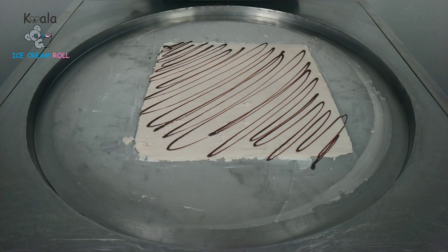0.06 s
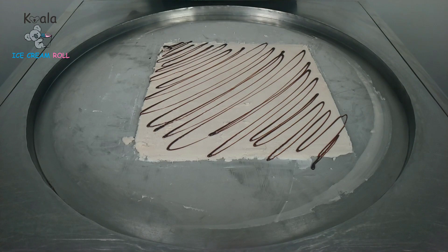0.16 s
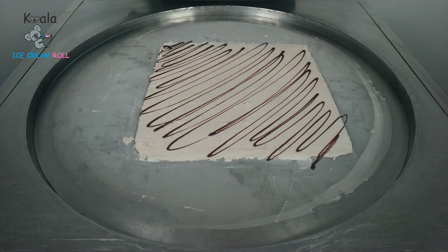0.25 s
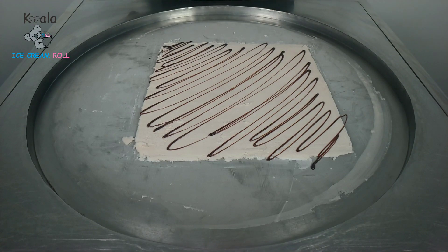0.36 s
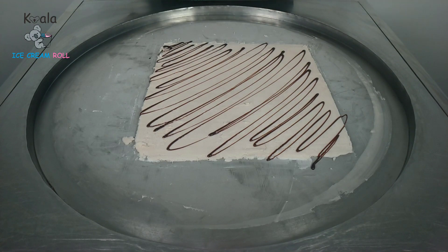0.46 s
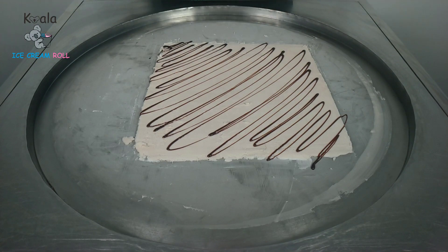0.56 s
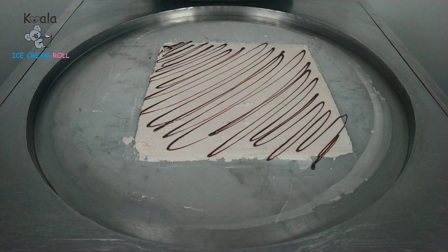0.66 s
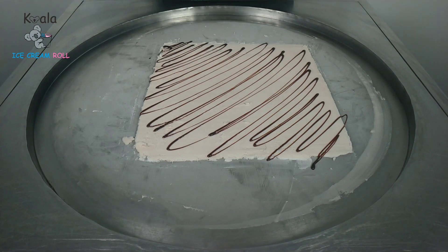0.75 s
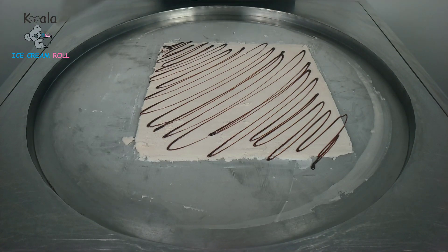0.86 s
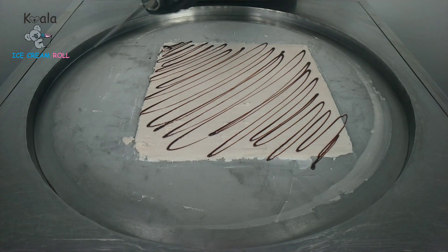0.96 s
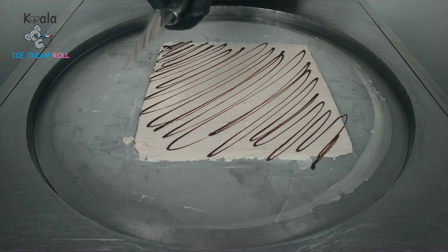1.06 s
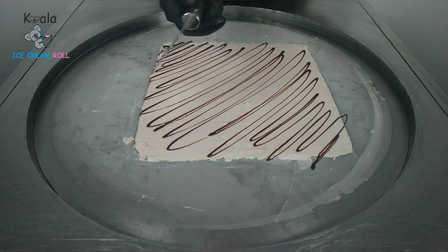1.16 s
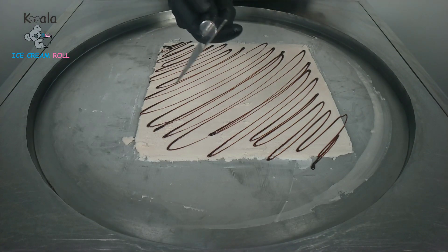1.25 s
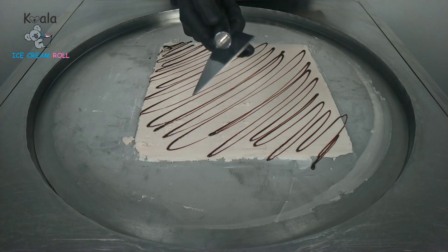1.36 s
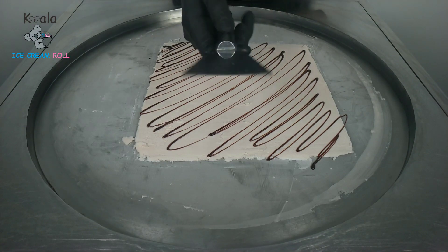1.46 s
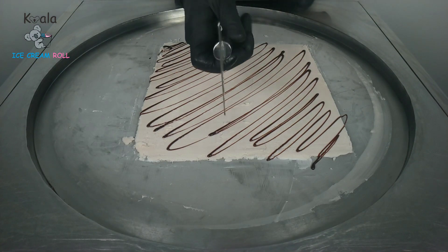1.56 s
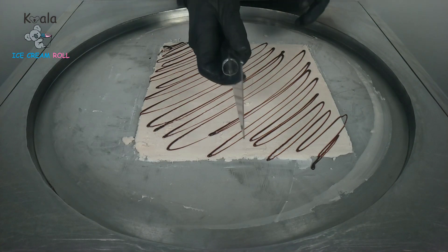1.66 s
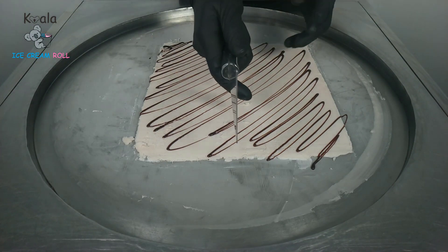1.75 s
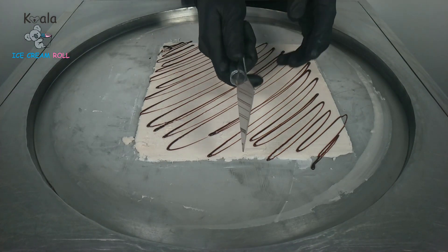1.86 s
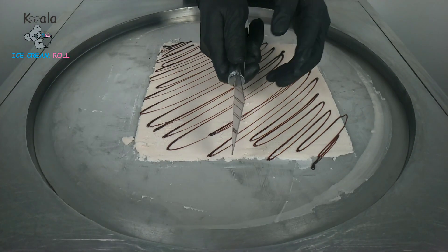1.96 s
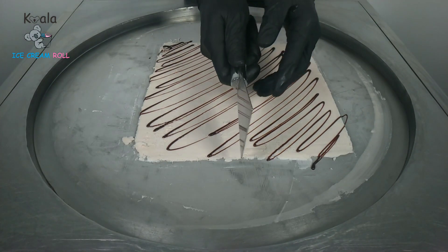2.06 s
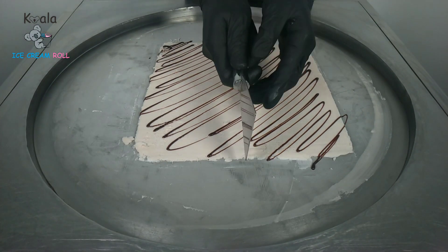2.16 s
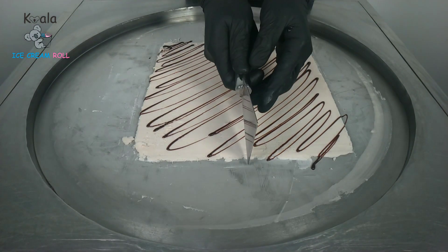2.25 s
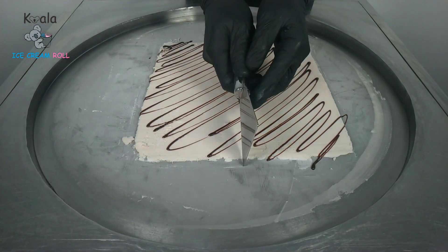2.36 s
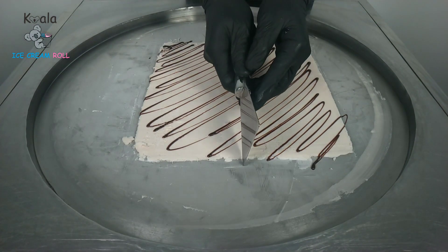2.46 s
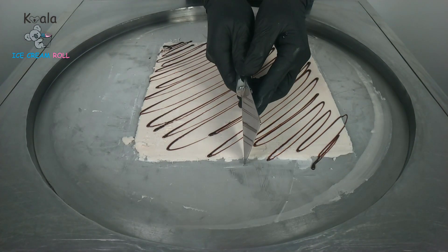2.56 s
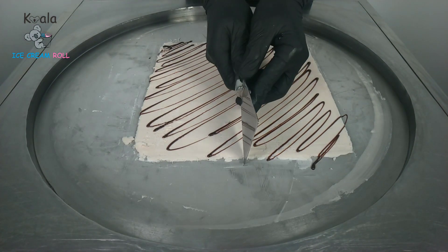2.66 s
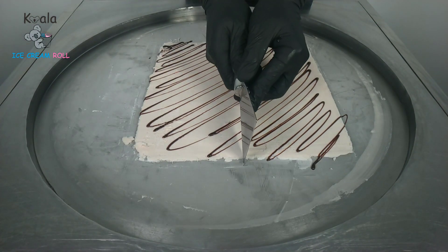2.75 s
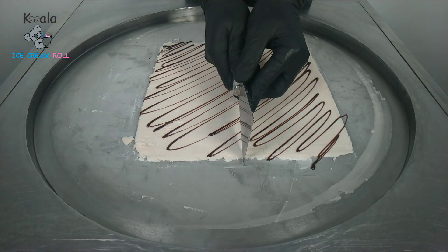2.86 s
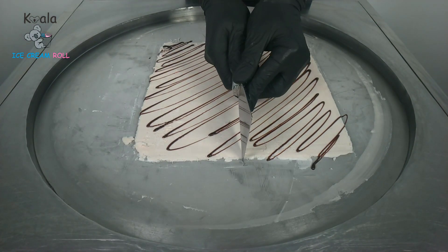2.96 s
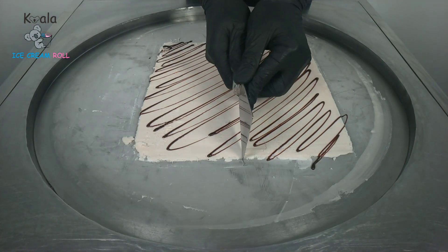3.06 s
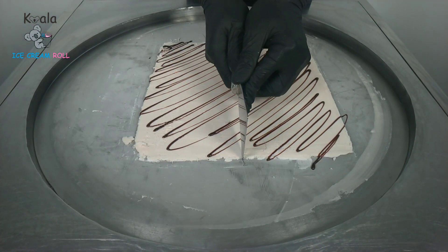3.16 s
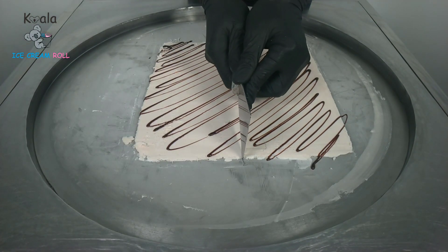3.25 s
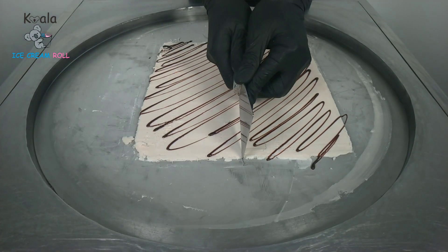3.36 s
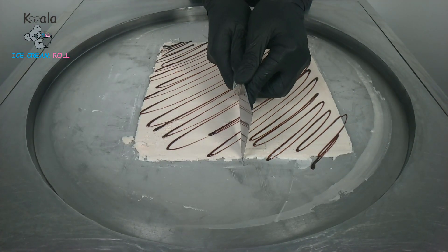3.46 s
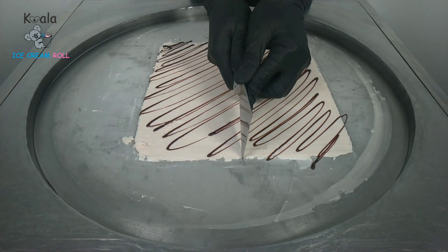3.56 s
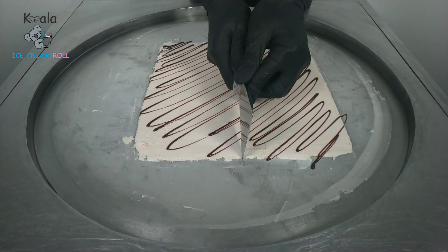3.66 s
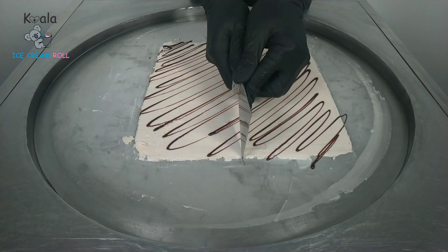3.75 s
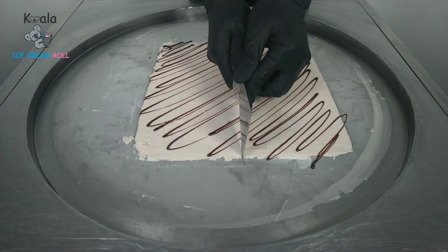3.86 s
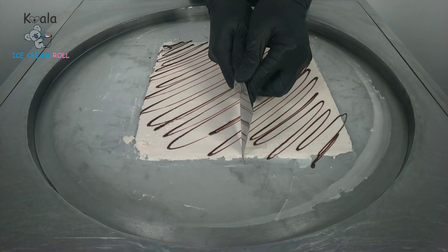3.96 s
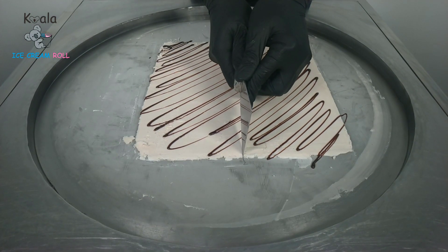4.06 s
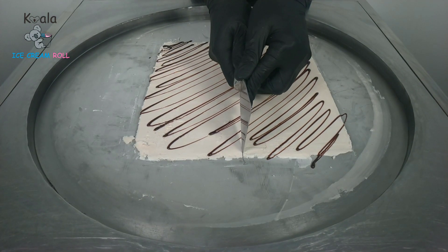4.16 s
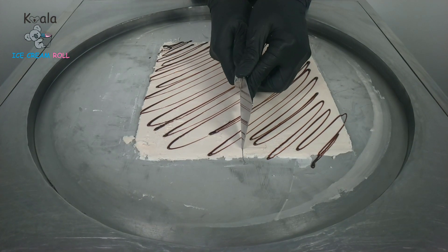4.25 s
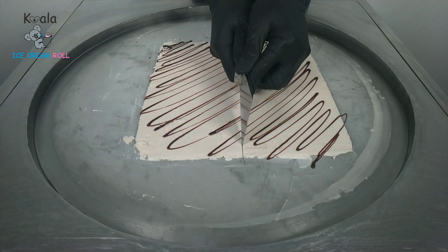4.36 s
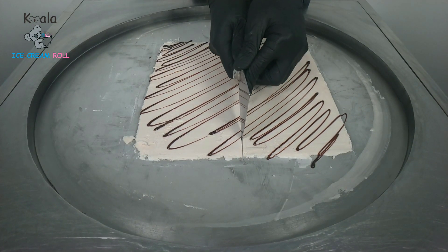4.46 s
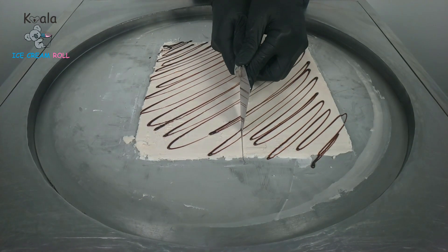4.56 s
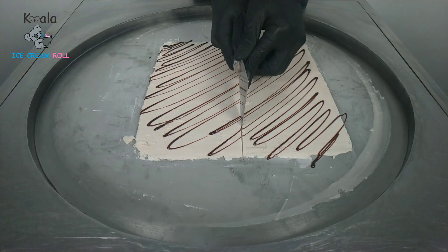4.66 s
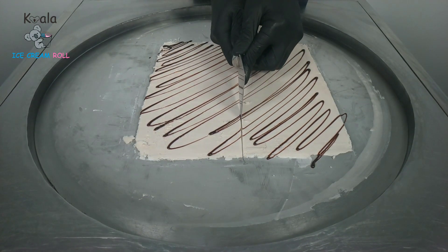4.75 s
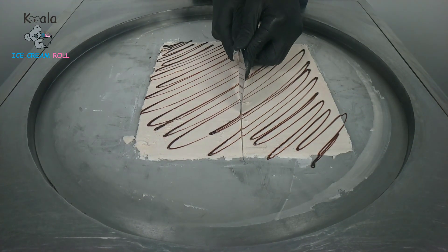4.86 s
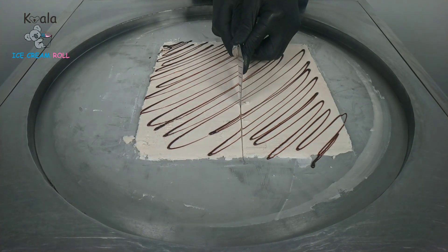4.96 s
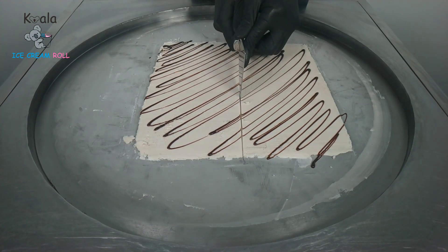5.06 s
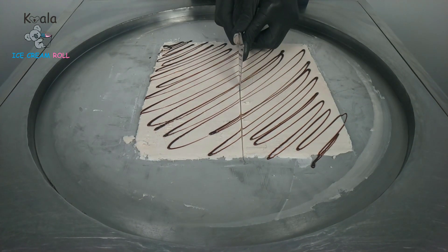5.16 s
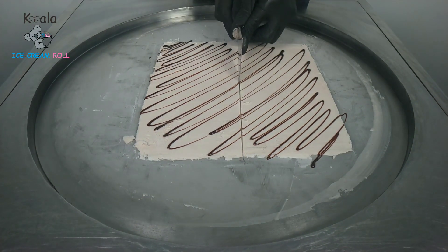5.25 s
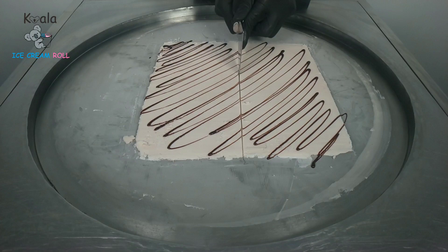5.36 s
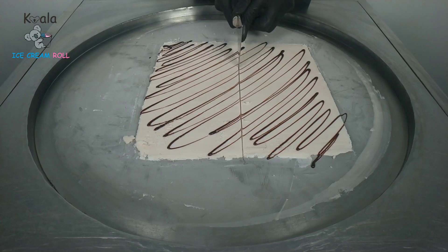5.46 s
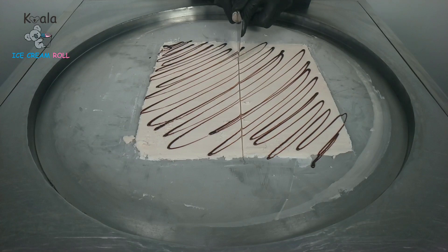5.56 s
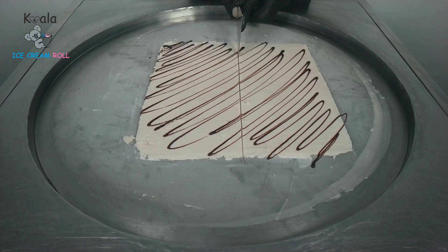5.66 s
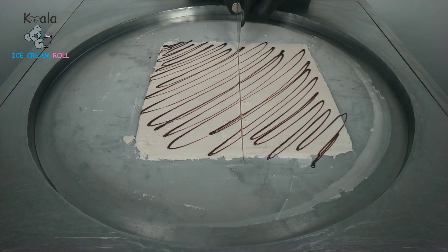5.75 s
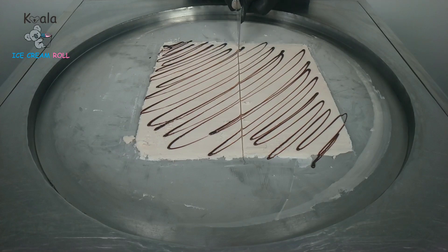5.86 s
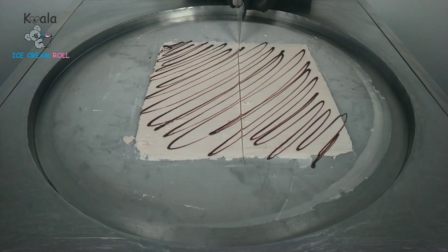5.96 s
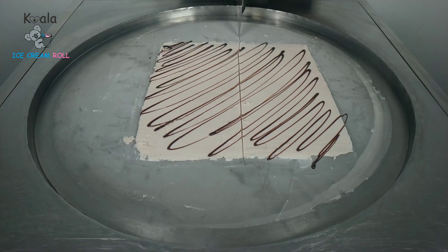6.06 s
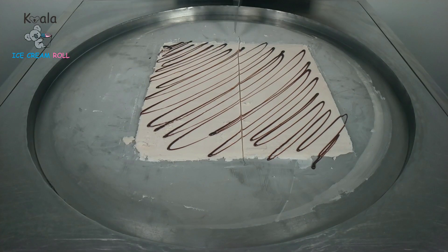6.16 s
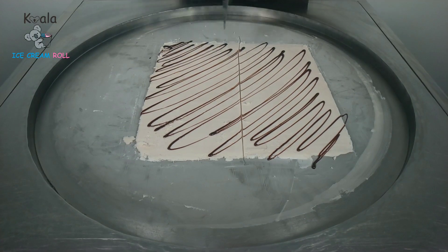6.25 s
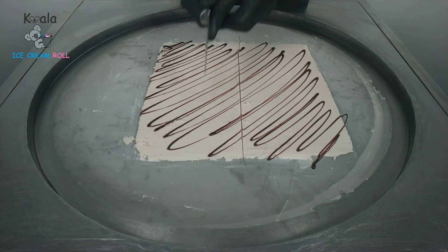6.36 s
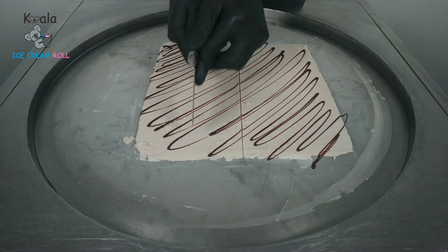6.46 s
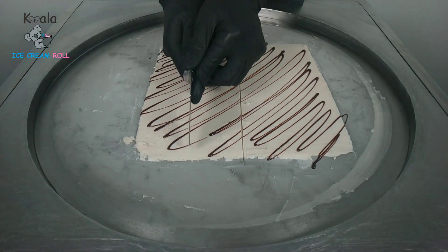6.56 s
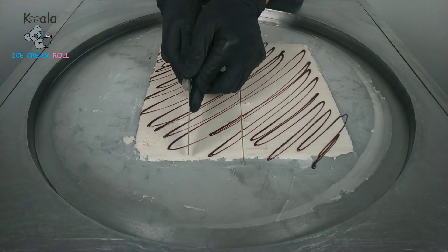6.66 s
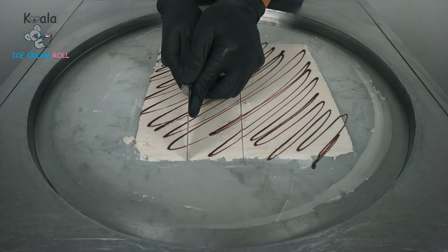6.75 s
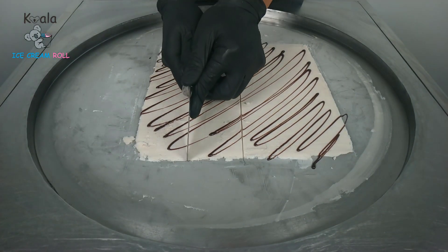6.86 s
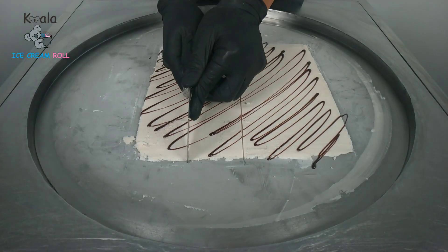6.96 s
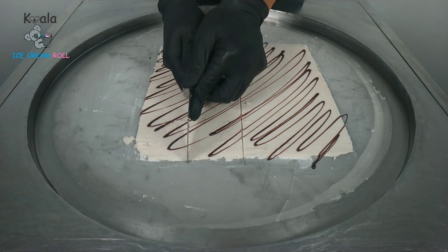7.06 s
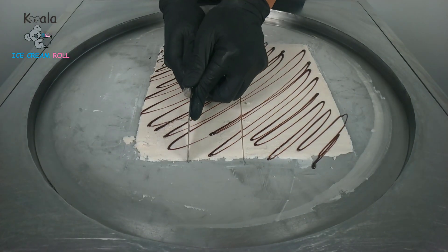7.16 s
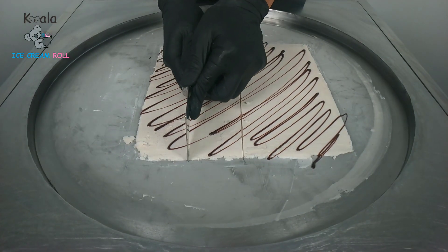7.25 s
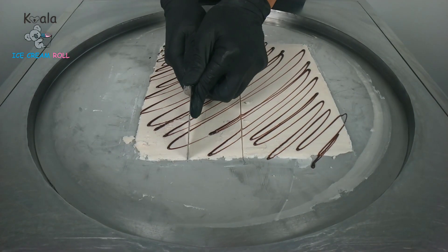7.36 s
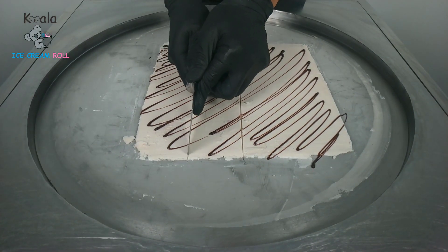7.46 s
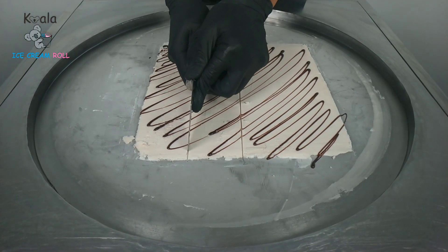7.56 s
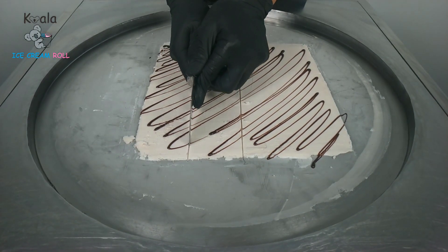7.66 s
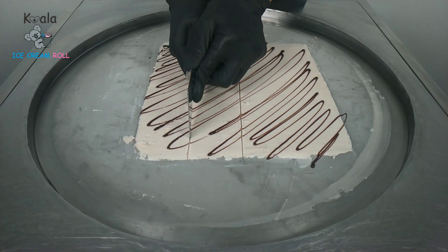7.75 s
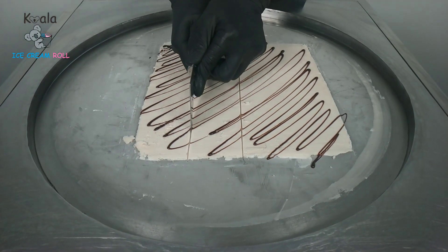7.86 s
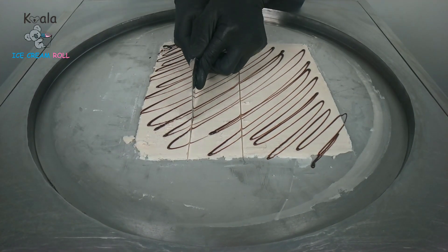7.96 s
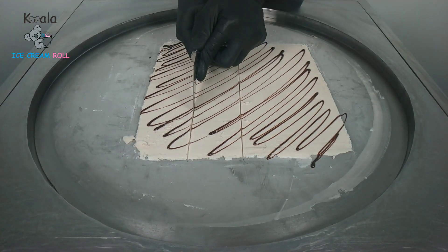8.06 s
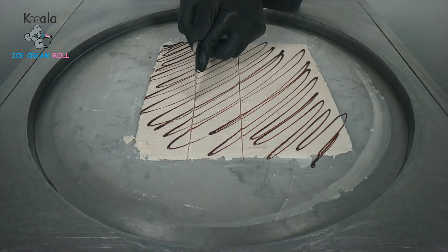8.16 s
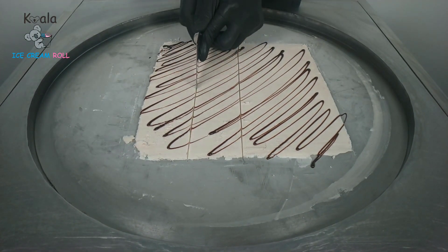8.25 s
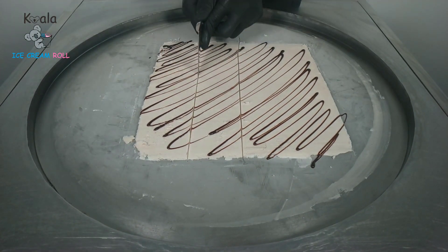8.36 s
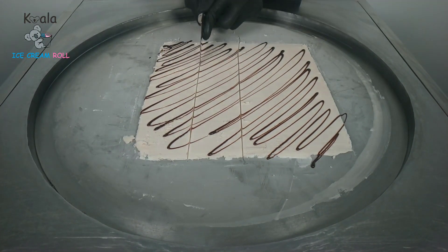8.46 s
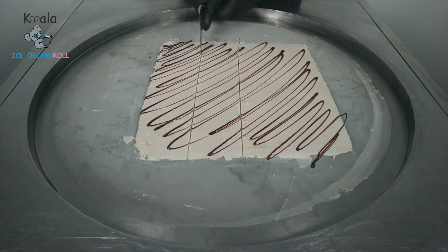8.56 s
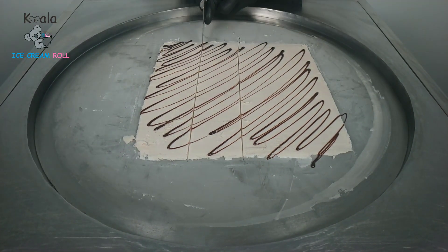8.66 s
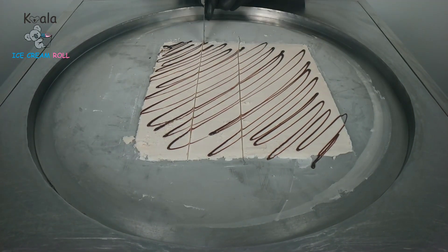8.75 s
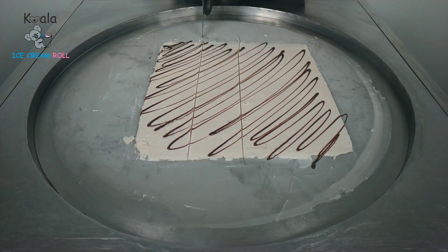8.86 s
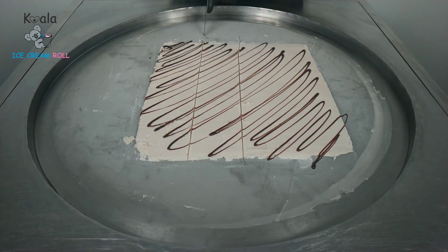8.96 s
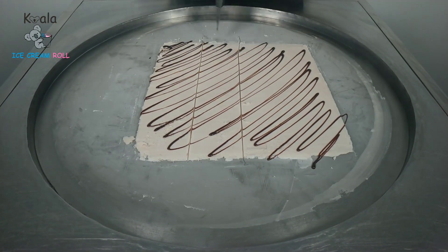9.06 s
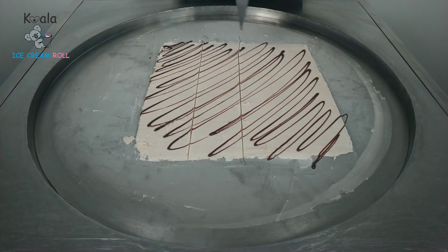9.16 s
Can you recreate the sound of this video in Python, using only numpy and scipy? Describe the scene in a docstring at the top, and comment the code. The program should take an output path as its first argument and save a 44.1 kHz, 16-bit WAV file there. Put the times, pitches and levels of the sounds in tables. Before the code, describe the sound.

In a small work area with low rumbling and faint motor tones, a steel tool is handled lightly, rustling and ringing softly. It strikes a frozen steel plate with a loud, short metallic crack, then thuds dully into a frozen sheet and drags with a grainy hiss. Two more hard knocks arrive well apart, each around stronger scraping. A single microphone hears everything fairly close and dry, with brief plate ringing.

```python
"""A steel spatula is knocked down on a frozen steel plate and drawn through a sheet of ice cream.
Blows thud the plate, ring its modes and the blade's and leave a dense wash of coloured noise.
Uneven random slips through a bed and damped resonances give handling rustle, then, from the first hard knock,
the scraping edge; short brushes glide upward, and a steel tone swells and dies away early.
Room air, a low rumble and motor tones place us by a freezer. One mono microphone; distance is only level."""
import sys
import numpy as np
from scipy import signal
from scipy.fft import rfft, irfft
from scipy.io import wavfile
from scipy.ndimage import uniform_filter1d, minimum_filter1d

SR = 44100
rng = np.random.default_rng(int(sys.argv[2]) if len(sys.argv) > 2 else 0)


def materialize(psi):
    """Save the field psi as 16-bit PCM at rate SR to the path in sys.argv[1].

    A 1-D psi becomes a single channel; in a 2-D psi each row is a channel.
    """
    bounded = np.clip(np.atleast_2d(psi).T, -1, 1)
    quanta = np.round(bounded * 32767).astype(np.int16)
    wavfile.write(sys.argv[1], SR, quanta)


N = 406161
T = np.arange(N) / SR
HZ = np.maximum(np.arange(N // 2 + 1) * SR / N, 1)
TOP_HZ = 15550  # top of the recorded band


def undb(db):
    """dB to gain."""
    return 10 ** (np.asarray(db) / 20)


def level(x, db):
    """Scale to an rms level [dB]."""
    return x * undb(db) / np.sqrt(np.mean(x ** 2))


def along(table, hz):
    """Read (frequency [Hz], value) points on a log frequency axis."""
    points_hz, values = np.transpose(table)
    return np.interp(np.log(hz), np.log(points_hz), values)


def colour(x, gain):
    """Weight a spectrum."""
    return irfft(rfft(x) * gain, N)


def hump(hz, octaves):
    """Bell-shaped band on a log frequency axis."""
    return np.exp(-.5 * (np.log2(HZ / hz) / octaves) ** 2)


def ring(x, hz, t60):
    """One decaying mode driven by x: a two-pole resonator."""
    pole = np.exp(2j * np.pi * hz / SR - np.log(1000) / (t60 * SR))
    return signal.lfilter([pole.imag], [1, -2 * pole.real, abs(pole) ** 2], x)


def walk(rate):
    """Random levels held 1 / rate s and smoothed twice."""
    hold = int(SR / rate)
    steps = np.repeat(rng.standard_normal(N // hold + 1), hold)
    return 0.95 * uniform_filter1d(uniform_filter1d(steps, hold), hold)[:N]


def spikes(times, gains):
    """Impulses at given times [s]."""
    out = np.zeros(N)
    out[(np.asarray(times) * SR).astype(int)] = gains
    return out


def decay(t, t60):
    """Exponential fall from t = 0, silent before."""
    return (t >= 0) * 1000. ** (-np.maximum(t, 0) / np.maximum(t60, .002))


# spectrum of the room air: (frequency [Hz], relative level [dB per Hz])
ROOM_SPECTRUM = [(70, -27), (105, -3.5), (260, -11.5), (480, -13.5), (1100, -18), (1900, -22.5),
                 (2400, -29), (2850, -30.5), (3800, -31), (5900, -30), (9200, -25.5), (10800, -25.5),
                 (11800, -33.5), (15500, -37)]
ROOM_DB = -63  # rms of the air before its bands flicker


def room_air():
    """Noise with the room's spectrum, in octave bands that flicker separately."""
    noise = rfft(rng.standard_normal(N)) * undb(along(ROOM_SPECTRUM, HZ))
    full_rms = np.sqrt(np.mean(irfft(noise, N) ** 2))
    air = np.zeros(N)
    for hz in 120 * 2. ** np.arange(8):
        air += irfft(noise * hump(hz, 0.41), N) * undb(2.0 * walk(37))
    return air / full_rms * undb(ROOM_DB)


# swell of the freezer's rumble: (time [s], level [dB])
RUMBLE_LEVEL = [(0.0, -64), (.46, -56), (1.3, -57), (1.92, -65.5), (2.5, -63.5), (4.16, -60.5), (5.6, -59),
                (6.0, -64), (7.7, -62.5), (8.8, -56.5), (9.21, -69)]
# spectrum of the rumble: (frequency [Hz], relative level [dB per Hz])
RUMBLE_SPECTRUM = [(20, -41.5), (33, -29.5), (48, 6), (62, 7.5), (76, -1), (95, -25.5), (130, -21.5)]
# faint motor tones: (mean frequency [Hz], mean peak level [dB])
MOTOR_TONES = [(876, -72), (630, -76)]


def freezer():
    """A swelling rumble of noise below 200 Hz, and motor tones that waver in pitch and level."""
    low_gain = undb(along(RUMBLE_SPECTRUM, HZ)) * (HZ < 200)
    s, db = np.transpose(RUMBLE_LEVEL)
    out = level(colour(rng.standard_normal(N), low_gain), 0) * undb(np.interp(T, s, db))
    for hz, db in MOTOR_TONES:
        phase = 2 * np.pi * np.cumsum(hz + 6 * walk(24)) / SR
        out += undb(db + 3.3 * walk(5.5)) * np.sin(phase)
    return out


# handling rustle before the first hard knock, then the edge drawn over the plate:
# (time [s], level [dB] of the part below SPLIT_HZ)
RUSTLE_AND_SCRAPE_LEVEL = [(0.0, -54.5), (.3, -55), (.6, -59.5), (.95, -48.5), (1.3, -63.5), (2.4, -68),
                           (2.5, -49), (2.62, -47), (2.9, -57.5), (3.9, -70.5), (4.23, -59.5), (5.2, -53.5),
                           (5.449, -50.5), (6.2, -39.5), (6.44, -54.5), (6.8, -64.5), (6.999, -57.5),
                           (7.5, -70), (7.851, -54), (8.0, -48.5), (8.59, -43.5), (8.9, -48), (9.11, -37.5),
                           (9.21, -53.5)]
# damped resonances of the plate under the frozen sheet: (frequency [Hz], width [Hz], relative level [dB])
DAMPED_PEAKS = [(250, 39, -7), (630, 97, -4.5), (959, 55, 1.5), (1302, 54, -8), (1814, 150, -5),
                (2010, 180, -6), (3700, 130, -15), (4200, 440, -22.5), (7100, 40, -10), (9100, 560, -23)]
# broad bed of rustle and scrape: (frequency [Hz], relative level [dB per Hz])
SCRAPE_SPECTRUM = [(120, -40), (250, -8), (800, 1), (1500, 0), (2050, -7.5), (2350, -5.5), (2800, -13.5),
                   (3500, -6), (5000, -7), (5900, -14), (7000, -11), (10800, -15), (11800, -37.5),
                   (15500, -27.5)]
SPLIT_HZ, HISS_DB = 2750, -6.5  # the upper part against the lower
OFF_PLATE_DB = -4.5  # the resonances are weaker until the first hard knock lands on the plate


def rustle_and_scrape():
    """Dense uneven slips drive a broad bed and damped resonances, each flickering alone."""
    slip_db = 2.2 * np.minimum(rng.exponential(size=N), 6) + 1.5 * walk(60)
    slips = rfft(rng.standard_normal(N) * undb(slip_db))
    bed = slips * undb(along(SCRAPE_SPECTRUM, HZ))
    upper = 1 / (1 + (SPLIT_HZ / HZ) ** 16)
    low, hiss = irfft(bed * np.sqrt(1 - upper), N), irfft(bed * np.sqrt(upper), N)
    off_plate_db = OFF_PLATE_DB * (T < KNOCKS[0][0])
    for hz, width, db in DAMPED_PEAKS:
        resonance = undb(db + 5) / (1 + 1.3j * (HZ - hz) / width) ** 2
        flicker_db = 2.6 * walk(9) + 1.5 * walk(2)
        tone = irfft(slips * resonance, N) * undb(flicker_db + off_plate_db)
        if hz < SPLIT_HZ:
            low += tone
        else:
            hiss += tone
    s, db = np.transpose(RUSTLE_AND_SCRAPE_LEVEL)
    return (level(low, 0) + level(hiss, HISS_DB)) * undb(np.interp(T, s, db))


# the steel tone swells and dips as the steel thing is moved about: (time [s], level [dB])
STEEL_TONE_LEVEL = [(0.0, -58), (.05, -52), (.42, -50.5), (.58, -55), (.65, -71), (.73, -59), (.81, -66),
                    (.86, -58), (1.0, -54), (1.26, -67), (1.63, -69), (2.3, -79)]
STEEL_TONE_HZ = 1585
# its upper partials: frequencies [Hz]
UPPER_PARTIAL_HZ = (3661, 3898)
# and, for each, (peak level [dB], time to fall 60 dB [s])
UPPER_PARTIALS = [(-61, 2.4), (-57, 1.2)]


def steel_tone():
    """A long steel sine that follows its level, with two upper partials struck once and left to decay."""
    s, db = np.transpose(STEEL_TONE_LEVEL)
    amplitude = np.sqrt(2) * undb(np.interp(T, s, db, right=-120))
    out = amplitude * np.sin(2 * np.pi * STEEL_TONE_HZ * T)
    for hz, (db, t60) in zip(UPPER_PARTIAL_HZ, UPPER_PARTIALS):
        out += ring(spikes([.03], undb(db)), hz, t60)
    return out


# noise spectrum of the struck plate: (frequency [Hz], relative level [dB per Hz])
PLATE_SPECTRUM = [(40, -38.5), (70, -23), (140, -26), (275, -11.5), (400, -15.5), (1300, -10), (1850, 0.5),
                  (2200, -8), (2750, -14), (3450, -3), (5200, -9), (5900, -20), (10800, -24.5),
                  (15500, -41.5)]
# how long the wash of dense modes lasts: (frequency [Hz], time to fall 60 dB [s])
WASH_DECAY = [(70, 0.51), (250, 0.18), (700, 0.37), (1300, 0.57), (1900, 0.52), (2750, 0.43), (3600, 0.54),
              (5200, 0.55), (9000, 0.38), (15000, 0.34)]
# single modes of the plate: frequencies [Hz]
PLATE_MODE_HZ = (70, 210, 275, 398, 474, 515, 645, 700, 748, 845, 938, 1139, 1266, 1362, 1600, 1765, 1860,
                 1920, 1985, 2230, 3650, 3887, 4050, 4357, 4620, 5157)
# and, for each, (relative level [dB], time to fall 60 dB [s])
PLATE_MODES = [(-12, 0.31), (-13.5, 0.51), (3.5, 0.2), (-5, 0.34), (-6, 0.17), (-9, 0.41), (-1, 0.094),
               (-10, 0.16), (-10.5, 0.52), (-15.5, 0.4), (6, 0.17), (-5.5, 0.33), (-2.5, 0.067),
               (-3.5, 0.28), (-4.5, 0.68), (-6.5, 0.28), (-2.5, 0.35), (1, 0.62), (-6, 0.13), (-9.5, 0.49),
               (-7, 0.2), (-7.5, 0.11), (-7.5, 0.055), (-7.5, 0.074), (1, 0.087), (0, 0.18)]
# single modes of the blade: frequencies [Hz]
BLADE_MODE_HZ = (5940, 6160, 7190, 7290, 7440, 8963, 9410, 10330, 11495, 12020, 12870, 13920, 14420)
# and, for each, (relative level [dB], time to fall 60 dB [s])
BLADE_MODES = [(-7.5, 0.08), (-6, 0.12), (-3, .35), (1.5, 0.17), (-1, 0.12), (-5, 0.24), (5.5, 0.092),
               (-4.5, 0.14), (0, 0.3), (-11.5, 0.22), (-6, .09), (-9, 0.087), (-8, .1)]
# the blade knocked hard on bare steel: (time [s], blow level [dB], brightness [dB per octave],
# pitch of the struck spot [Hz], ring length [1 = free], boom of the table [dB], blade [dB])
KNOCKS = [(2.403, -2.5, -0.37, 1800, 0.97, -5, 10.5), (6.117, -2.5, 0.37, 1774, 0.96, 5, -4),
          (8.908, -2, 2.1, 1700, 1.126, 9, -4.5)]
# dull thuds of the blade into the frozen sheet, same columns; the first row is the dying end of an earlier blow
THUDS = [(.003, -34.5, 0.65, 240, 1.17, -6, 7), (2.81, -31.5, 2.4, 1610, 0.52, -11, 16.5),
         (4.058, -21.5, 1.2, 2160, 0.99, 7, -1), (5.233, -17.5, 0.75, 2100, 0.83, 9.5, -16),
         (6.29, -33, -2, 1880, 0.87, -1, .1), (6.843, -20, -1.6, 950, 0.71, -17, -14),
         (7.479, -41.5, 2.4, 1065, 1, 1.2, -3.5), (8.605, -14.5, 0.41, 2080, 0.65, 5, -5)]
# small bright ticks, same columns
TICKS = [(.543, -49, -1, 3500, 0.49, 2, -1), (.759, -31, 2.3, 8100, 0.47, -12, 1),
         (.827, -42.5, 0.93, 10900, 0.6, .1, 6), (.979, -38, -0.4, 1920, 0.56, 5, 22.5),
         (1.619, -48, .1, 8500, .4, .1, -8), (1.776, -35, -3.4, 7900, 0.5, 4, 18),
         (1.969, -50, .1, 4150, 0.79, 17, 10), (3.111, -39.5, -0.28, 4100, .4, 4, -8),
         (3.298, -40.5, 1.5, 8950, 0.41, 0.8, -14.5), (4.84, -36.5, 1.7, 5700, 0.27, -4, -5),
         (5.987, -54, -0.02, 9000, .3, -25, .1), (6.015, -39, 1.5, 10500, .3, .1, 9)]
# frequencies at which each kind of blow has its colour [Hz]
KIND_HZ = (70, 280, 620, 940, 1300, 1880, 4200, 8500, 13000)
# character of a knock: (levels at KIND_HZ against the blow level [dB], wash [dB], blade ring [dB],
# lift at the struck spot [dB], width of that lift [octaves])
KNOCK_KIND = (-47, -27.5, -23.5, -21.5, -14, -14, -11, -25.5, -43.5), -16, -13.5, 4.5, 0.1
# character of a thud, same columns
THUD_KIND = (-24.5, -16.5, -13, -21.5, -25.5, -18.5, -26.5, -24, -61), -13.5, -14, 13.5, 0.26
# character of a tick, same columns
TICK_KIND = (-38, -37.5, -26, -23.5, -25.5, -14.5, -20.5, -16.5, -27), -15.5, -23, 11, .35
TOUCH_S, TOUCH_DB = .0025, -24  # lead and level of the light touch before a hard blow
CUSHION_S = .012  # extra build-up time of a thud
BOOM_HZ, BLADE_FROM_HZ = 120, 7500  # boom lies below the one; blade crack grows over an octave above the other
BAND_HZ = 60 * 2 ** np.arange(0, 8.1, 1 / 3)  # third-octave centres


def plate_bands():
    """Noise of the plate's many dense modes, cut into third-octave bands."""
    # 0 dB per Hz puts unit power into 420 Hz
    noise = rfft(rng.standard_normal(N)) * undb(along(PLATE_SPECTRUM, HZ)) * np.sqrt(SR / 2 / 420)
    # the damped resonances stand out of the wash too
    peaks = sum(0.8 / (1 + (2 * (HZ - hz) / width) ** 2) for hz, width, _ in DAMPED_PEAKS)
    noise *= np.sqrt(0.73 + peaks)
    return np.array([np.resize(irfft(noise * hump(hz, 1 / 7), N), N + SR) for hz in BAND_HZ])


def blow_db(hz, blow, kind):
    """Level of a blow at hz: its kind's colour, tilted, lifted at the struck spot, with boom and blade."""
    _, peak_db, bright_db, spot_hz, _, boom_db, blade_db = blow
    kind_db, _, _, spot_db, octaves = kind
    # the colour is taken against the plate's spectrum and a bandwidth that grows with frequency
    kind_gain_db = kind_db - along(PLATE_SPECTRUM, KIND_HZ) - 10 * np.log10(np.array(KIND_HZ) / 1800)
    db = peak_db + along(np.transpose([KIND_HZ, kind_gain_db]), hz)
    db = db + bright_db * np.log2(hz / KIND_HZ[5])
    db = db + spot_db * np.exp(-.5 * (np.log2(hz / spot_hz) / octaves) ** 2)
    return db + boom_db * (hz < BOOM_HZ) + blade_db * np.clip(np.log2(hz / BLADE_FROM_HZ), 0, 1)


def noise_shape(t, length, wash_db, hard, cushion):
    """Envelope per band: a sharp snap, a crack and the slower wash."""
    centres = BAND_HZ[:, None]
    # in a hard blow a corner touches lightly just before the edge lands
    since_touch = t + TOUCH_S
    touch = hard * undb(TOUCH_DB) * decay(since_touch, 0.046) * (1 - decay(since_touch, 0.0027))
    snap = undb(3.0) * decay(t, length * (0.023 + 6 / centres))
    crack = undb(-11.5) * decay(t, length * (0.019 + 14 / centres))
    # the wash fills in slowly as waves spread over the plate and come back off the walls
    wash_fall = decay(t, length * along(WASH_DECAY, BAND_HZ)[:, None])
    wash = undb(wash_db + 5) * (wash_fall - 0.65 * decay(t, length * .22))
    # a band needs a cycle or so to build up, and longer when the frozen sheet cushions the blow
    swell = 1 - decay(t, cushion + 3 / centres)
    return np.sqrt(touch ** 2 + swell ** 2 * (snap ** 2 + crack ** 2 + wash ** 2))


def blows():
    """Each blow cracks, rings the modes of plate and blade and leaves a wash of dense modes."""
    out, span = np.zeros(N + SR), int(.55 * SR)
    bands = plate_bands()
    hz = np.array(PLATE_MODE_HZ + BLADE_MODE_HZ)
    mode_db, t60 = np.transpose(PLATE_MODES + BLADE_MODES)
    on_blade = hz > PLATE_MODE_HZ[-1]
    # the modes come in close clusters, so each ring flutters
    flutter = undb(5.5 * np.array([walk(70) for _ in range(4)]))
    for table, kind in ((KNOCKS, KNOCK_KIND), (THUDS, THUD_KIND), (TICKS, TICK_KIND)):
        _, wash_db, ring_db, _, _ = kind
        hard, cushion = table is KNOCKS, CUSHION_S * (table is THUDS)
        for blow in table:
            s, length, blade_db = blow[0], blow[4], blow[6]
            a = int(s * SR)
            t = np.arange(span) / SR - TOUCH_S * hard
            shape = noise_shape(t, length, wash_db, hard, cushion)
            out[a:a + span] += undb(blow_db(BAND_HZ, blow, kind)) @ (bands[:, a:a + span] * shape)
            # each blow lands on another spot, so every mode gets another share
            share_db = 2.8 * rng.standard_normal(len(hz)) - 17.5
            on_blade_db = (ring_db + 0.53 * blade_db) * on_blade
            gains = undb(blow_db(hz, blow, kind) + mode_db + share_db + on_blade_db)
            envelope = decay(t, length * t60[:, None]) - decay(t, cushion + 4 / hz[:, None])
            rings = envelope * np.sin(2 * np.pi * hz[:, None] * t)
            for k in range(4):  # every fourth mode shares a flutter; polarity alternates
                group = (-1) ** k * gains[k::4] @ rings[k::4]
                out[a:a + span] += group * np.roll(flutter[k], -a)[:span]
    return out[:N]


# short brushes of blade or glove: (time [s], length [s], level before shaping and colour [dB],
# starting centre [Hz], width [Hz], relative blade ring [dB])
BRUSH_EVENTS = [(0.158, 0.078, -50.5, 9000, 2540, -35), (.6, .45, -49, 10260, 6000, -52),
                (0.853, 0.2, -51.5, 3990, 900, -37), (0.894, 0.155, -60, 1890, 600, -30),
                (2.609, 0.038, -51, 11300, 5000, -0.5), (2.677, 0.052, -41.5, 6890, 6030, -15),
                (2.787, .034, -54, 3620, 900, -28), (2.796, .043, -51, 1580, 250, -38.5),
                (7.808, 0.32, -59, 8300, 2526, -24), (8.433, 0.064, -46.5, 7800, 3500, -36),
                (9.083, 0.045, -34.5, 8420, 5900, -3.5), (9.084, 0.053, -42, 993, 1580, -20)]
GLIDE_OCTAVES_PER_S = 1.8  # the band climbs while the brush lasts


def brushes():
    """Soft friction in a gliding band, coloured like the scrape; it rings blade modes in and near the band."""
    rub, rings = np.zeros(N), np.zeros(N)
    for s, length, db, start_hz, width_hz, blade_db in BRUSH_EVENTS:
        a, n = int(s * SR), int(length * SR)
        noise = rng.standard_normal((3, n))
        shape = np.sin(np.pi * np.arange(n) / n)
        # two slow noises on a gliding carrier make the moving band
        slow = signal.sosfilt(signal.butter(2, width_hz / 2, fs=SR, output="sos"), noise[:2])
        glide_hz = start_hz * 2 ** (GLIDE_OCTAVES_PER_S * np.arange(n) / SR)
        phase = 2 * np.pi * np.cumsum(np.minimum(glide_hz, TOP_HZ)) / SR
        rub[a:a + n] += shape * level(slow[0] * np.cos(phase) + slow[1] * np.sin(phase), db)
        # the push on the blade, with half a second for it to ring out
        push = shape * noise[2] * undb(db + blade_db - 30.5)
        push = np.pad(push, (0, SR // 2))[:N - a]
        for hz, (mode_db, t60) in zip(BLADE_MODE_HZ, BLADE_MODES):
            share = np.exp(-((hz - start_hz) / width_hz) ** 2)
            rings[a:a + len(push)] += undb(mode_db) * share * ring(push, hz, t60)
    return rings * undb(4.8 * walk(70)) + colour(rub, undb(along(SCRAPE_SPECTRUM, HZ) + 7.5))


def scene():
    """All sources summed at one microphone."""
    return (room_air() + freezer() + rustle_and_scrape() + steel_tone() + blows() + brushes())[None]


def record(dry):
    """A quick limiter turns down peaks above its ceiling; a steep low-pass cuts the top."""
    ceiling, k = .86, int(.0015 * SR)  # full scale = 1; 1.5 ms smoothing
    gain = minimum_filter1d(ceiling / np.maximum(np.abs(dry), ceiling), 2 * k + 1)
    low_pass = signal.ellip(10, .2, 70, TOP_HZ, fs=SR, output="sos")
    return signal.sosfilt(low_pass, dry * uniform_filter1d(gain, k))


dry = scene()
out = record(dry)
materialize(out)
```